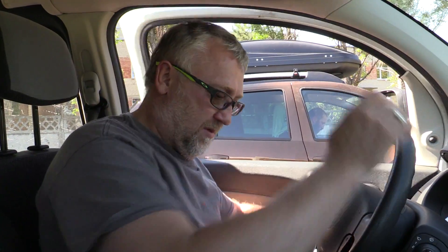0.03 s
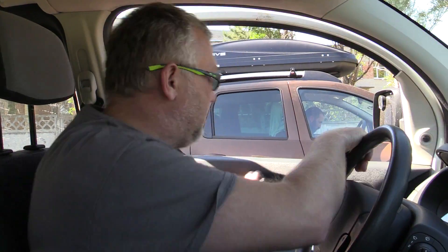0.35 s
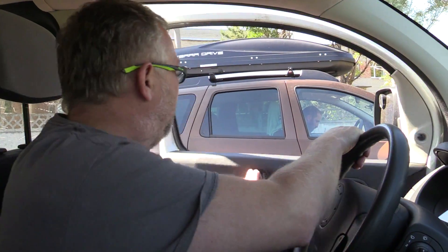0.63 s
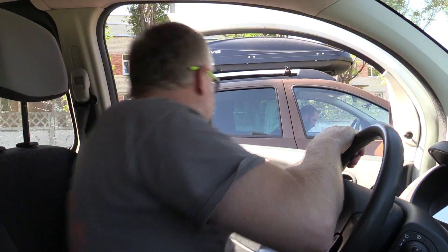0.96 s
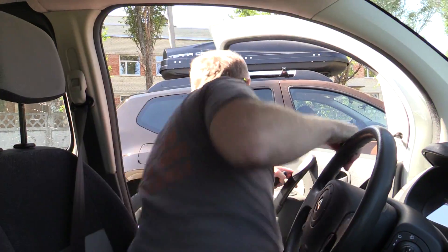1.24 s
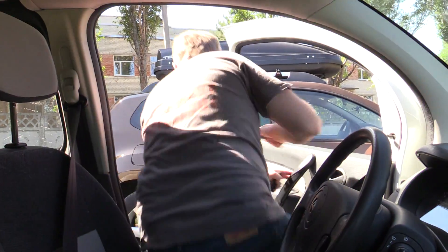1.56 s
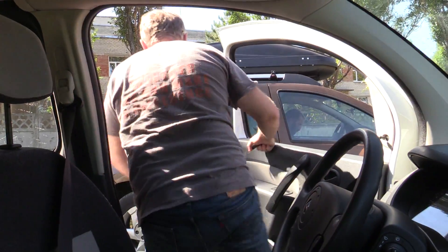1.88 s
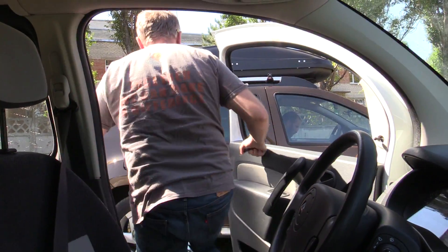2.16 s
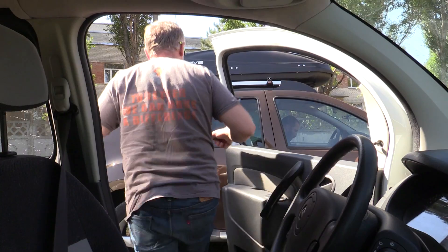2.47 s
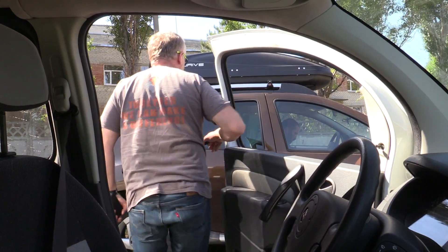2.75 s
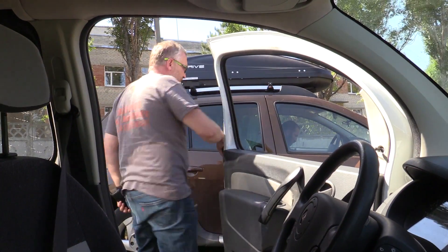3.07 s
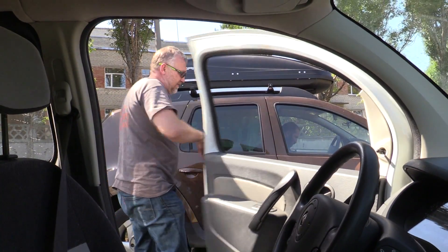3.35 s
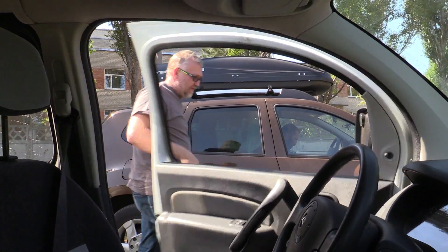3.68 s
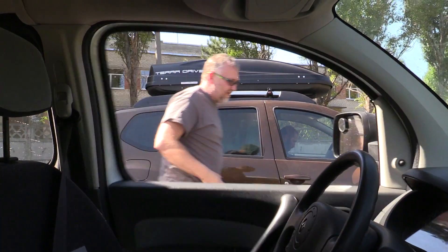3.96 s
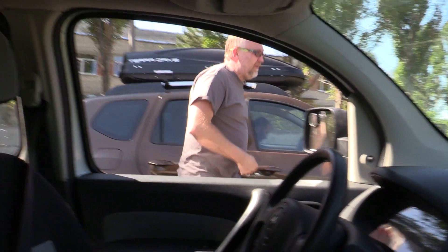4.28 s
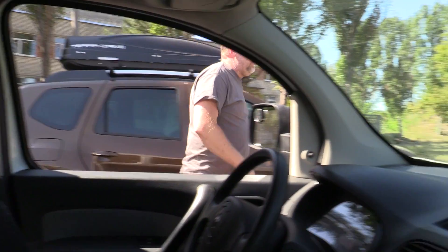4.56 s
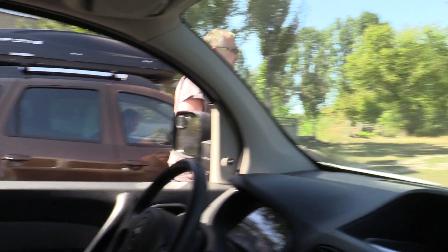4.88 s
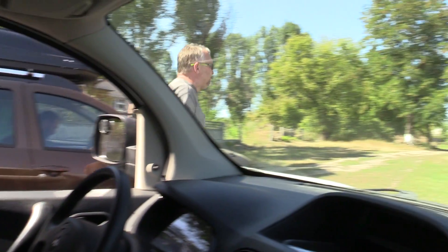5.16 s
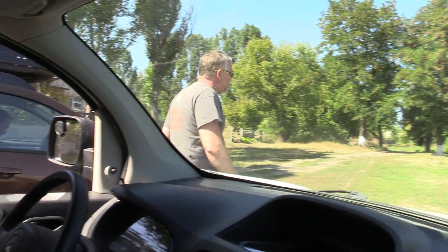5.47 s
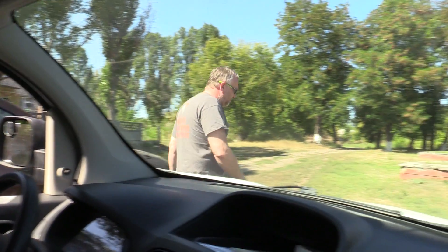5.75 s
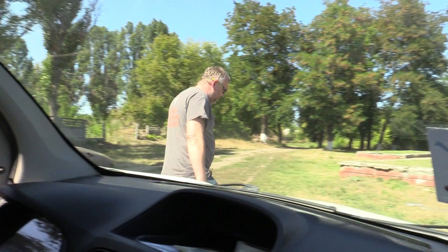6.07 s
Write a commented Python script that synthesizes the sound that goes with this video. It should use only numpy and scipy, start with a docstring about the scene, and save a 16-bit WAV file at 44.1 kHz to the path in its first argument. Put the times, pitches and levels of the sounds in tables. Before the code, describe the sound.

The sound is heard from the passenger seat of a car. Right at the start the door handle springs back with a small click and a tiny squeak. From about 0.3 to 2.7 seconds the driver slides off the seat and climbs out: cloth rustles, the cushion rumbles, limbs knock on plastic trim and weight thumps on the floor, with the sharpest knock near 1.9 seconds. A faint idling engine, distant rumble and hissing leaves run underneath, with a little more bass while the door is open. After a few soft brushes of cloth, the door's holding strap clunks quietly at 3.4 seconds. At 4 seconds the door slams, by far the loudest event: the lock snaps, the door booms and its panels rattle briefly. The cabin is then quiet apart from the faint background, until a small plastic case clicks several times in a hand around 6 seconds.

```python
"""A car door slams, heard from inside: the lock snaps, the door booms and its panels rattle.
Before that, the driver opens the door, slides off the seat and climbs out: cloth rustles, limbs knock
on the plastic trim, and the strap that holds the door open clunks. Afterwards a small plastic case
clicks in someone's hand. Behind it all are an idling engine, a far rumble and hissing leaves."""
import sys
import numpy as np
from scipy.fft import rfft, irfft, next_fast_len
from scipy.io import wavfile
from scipy.ndimage import map_coordinates

SR = 44100
rng = np.random.default_rng(int(sys.argv[2]) if len(sys.argv) > 2 else 0)


def transcribe(u):
    """Save the signal u as a 16-bit wav file named by the first command-line argument.

    u: samples, shape (n,) or (channels, n), limited to [-1, 1]; the rate is SR.
    q: integer samples, one column per channel.
    """
    v = np.clip(np.atleast_2d(u).T, -1, 1)
    q = np.round(v * 32767).astype(np.int16)
    wavfile.write(sys.argv[1], SR, q)


N = 278623

# A "tone" says how strong each frequency is: (frequency [Hz], relative level [dB])
FAR_TONE = [(15, -17), (30, -7), (45, -7.5), (70, -28.5), (170, -9), (225, -21), (330, -16), (440, -16),
            (590, -12.5), (750, -18.5), (1100, -17.5), (1700, -23.5), (2500, -40), (5000, -54.5)]
LEAF_TONE = [(800, -3), (2200, 1.5), (4000, -1), (6500, -8), (9000, -14), (12000, -22.5), (16000, -29)]
DRONE_TONE = [(30, -45), (70, -14.5), (110, 1), (165, 0), (215, -14), (400, -12.5), (800, -31.5),
              (2000, -49.5)]
CUSHION_TONE = [(20, -24), (60, -9), (110, 1.5), (165, -0.5), (195, 6), (235, -2.5), (290, -7),
                (380, -10.5), (600, -18.5), (1000, -28), (3000, -59)]
CLOTH_TONE = [(200, -14), (500, 10.5), (900, 6.5), (1800, 5.5), (3200, 1.5), (5000, -12), (7000, -49),
              (10000, -58), (16000, -42)]
BRUSH_TONE = [(500, -4), (2000, 5.5), (4000, 4.5), (6500, 3), (9000, -1.5), (12000, -7), (16000, -13)]
HISS_TONE = [(1000, 11), (2500, -2), (4200, 6), (6300, 0.5), (8000, -6.5), (11000, -17), (16000, -20)]
FLOOR_TONE = [(25, -32), (60, -12), (100, 2), (190, -2.5), (280, -6), (420, -9), (700, -21.5), (1500, -59),
              (5000, -82)]
TRIM_TONE = [(60, -17), (250, -20), (393, 7.5), (550, 3), (720, 4.5), (900, 0), (1200, 1.5), (1500, 0.5),
             (1800, -13), (2700, -5), (4500, -10), (7000, -20), (10000, -34), (16000, -48)]
LOCK_TONE = [(100, 0), (500, 6), (1250, 1), (2000, -1.5), (2900, 0.5), (4300, -9.5), (6000, -18),
             (8000, -25), (12000, -34.5), (16000, -45)]
PANEL_TONE = [(30, -30), (80, -5.5), (180, -9), (260, 1.5), (330, -3.5), (480, 3), (900, -6), (1400, -9.5),
              (2000, -19), (3200, -19.5), (5000, -32.5), (7000, -34), (10000, -46.5), (16000, -63)]
ROCKING_TONE = [(12, -46), (30, 3), (50, 5), (90, -26), (300, -93)]
BOUNCE_TONE = [(400, -18), (900, 9), (1900, 0), (3000, 0), (4200, -31), (9000, -36)]

# The notes of struck parts. A ring time is how long a sound takes to fade by 60 dB.
# (frequency [Hz], relative level [dB], ring time [s])
CASE_THUD_NOTES = [(287, -8, 0.026), (470, 10, 0.0071), (770, 1, 0.0098), (1740, 4, 0.0085)]
HANDLE_NOTES = [(830, -32, 0.05), (917, -22.5, 0.049), (1590, -27.5, 0.055), (1800, -34, 0.058),
                (2710, -30, 0.046), (3300, -40, .04)]
STRAP_NOTES = [(103.3, -29, 0.39), (169, -21.5, 0.14), (182, -30.5, 0.2), (500, -28.5, 0.085)]
CLAW_NOTES = [(5680, -3, 0.04), (6150, -1, 0.032), (6600, -3.5, 0.027), (7350, -7, 0.029),
              (7860, -10, 0.032)]  # the lock's steel claw
BOOM_NOTES = [(51.5, -27, 0.41), (67.3, -14, 0.23), (82, -9, 0.19), (100, -26, 0.53), (131, -18, 0.13),
              (146.5, -18.5, 0.4), (236, -17.5, 0.36), (260.6, -12.5, 0.32), (381.6, -14, 0.18),
              (448, -16.5, 0.22), (489, -21, 0.18), (570, -21, 0.15), (675, -22, 0.35), (700, -23, 0.2),
              (756, -23, 0.21), (857, -26.5, 0.31), (1078, -30, 0.22), (1240, -27, 0.23), (1380, -38, 0.43),
              (2135, -27, 0.18), (2620, -46, 0.2)]  # the door's shell and the air in the car
# The plastic case's tick: (multiple of its pitch, relative level [dB], ring time [s])
CASE_TICK_NOTES = [(1, 8.5, 0.0074), (1.3, -16, 0.014), (1.95, -7.5, 0.0069), (2.4, -28, 0.0051)]
# How long the door panels ring: (frequency [Hz], ring time [s])
PANEL_RING_TIMES = [(80, 0.68), (250, 0.34), (700, 0.096), (3000, 0.23), (7000, 0.076), (14000, 0.22)]

# The engine's hum: (multiple of the firing rate, level with the door shut [dB])
ENGINE_NOTES = [(1, -60.5), (2, -55), (3, -59), (4, -67), (5, -59)]
# The far rumble and the leaves rise and fall: (time [s], relative level [dB])
FAR_LEVELS = [(2.4, -57.5), (3.69, -54.5), (4.02, -51), (4.43, -54.5), (5.7, -52.5), (6.32, -55.5)]
LEAF_LEVELS = [(2.4, -62.5), (3.73, -60), (3.98, -59.5), (4.81, -64), (5.81, -64), (6.17, -69.5),
               (6.32, -73)]
# Clicks of the case: (time [s], tick gain [dB], snap level [dB])
CASE_CLICKS = [(5.954, -43, -30), (6.029, -27.5, -52), (6.0342, -28.5, -52), (6.0970, -29, -45),
               (6.1083, -42, -33), (6.1229, -22.5, -39), (6.197, -47, -29.5), (6.2008, -29.5, -36),
               (6.2072, -40, -34), (6.2733, -47, -45)]
# Thin squeaks: (time [s], length [s], start pitch [Hz], end pitch [Hz], level [dB])
SQUEAK_GLIDES = [(0, 0.021, 2440, 2440, -36), (2.487, 0.04, 2800, 2570, -55.5),
                 (2.538, 0.026, 2500, 2410, -53.5)]
# Sounds that swell and fade: (time [s], level [dB], half length [s])
CLOTH_BRUSHES = [(.02, -53, 0.018), (0.206, -57.5, 0.054), (0.281, -48, 0.019), (.41, -56, 0.009),
                 (1.168, -45.5, 0.046), (1.27, -57, 0.037), (1.334, -48, 0.022), (1.379, -50.5, 0.033),
                 (2.6, -61.5, 0.037), (3.078, -57, 0.027), (3.3, -63, 0.13), (3.81, -57, 0.012),
                 (4.633, -60.5, 0.043), (5.18, -65.5, 0.07)]
LONG_HISSES = [(.66, -49, 0.21), (1.05, -53.5, 0.14), (3.7, -67, 0.21), (5.68, -65.5, 0.38)]  # first two: cloth sliding on the seat; last two: hiss from outdoors
CAR_ROCKS = [(.36, -37, 0.061), (.65, -39.5, 0.25), (.85, -53, 0.043), (2.08, -33, 0.095)]
HAND_RUMBLES = [(5.89, -46.5, 0.015), (6.07, -46, 0.098)]
# The driver shoves across the seat: (time [s], half length [s], cushion level [dB], cloth level [dB])
SEAT_SHOVES = [(0.025, 0.025, -43.5, -42.5), (0.183, 0.063, -49, -47.5), (0.313, 0.017, -39, -38.5),
               (.372, 0.056, -31.5, -52), (0.532, 0.019, -36, -44.5), (0.583, 0.027, -37.5, -41),
               (0.658, 0.05, -30.5, -71), (0.818, 0.033, -31.5, -46.5), (1.214, 0.053, -36, -49),
               (1.612, 0.034, -45, -55.5), (1.935, 0.029, -30.5, -48.5), (2.002, 0.017, -28, -42),
               (2.16, 0.023, -30.5, -53.5), (2.256, 0.031, -30.5, -71), (2.305, 0.012, -37, -52.5)]
# Knocks on the trim: (time [s], level [dB], brightness [dB/octave], note pitch [Hz], note level [dB])
TRIM_KNOCKS = [(0.32, -29.5, -4, 715, -28), (0.381, -25, -6, 873, -23), (.396, -32.5, -2, 520, -35),
               (0.511, -31.5, -6, 696, -52), (.742, -34, -2, 993, -27), (0.837, -33.5, -5.5, 810, -32),
               (1.224, -34.5, 1, 800, -36), (1.297, -39, 2, 915, -52), (1.352, -45, -1, 870, -30),
               (1.41, -37, -0.5, 1080, -36), (1.8726, -22, 1, 393, -21), (1.921, -43, 1.5, 540, -40),
               (1.990, -35, 0, 390, -44), (2.232, -32, -6, 394, -28), (2.243, -37, -7, 563, -32),
               (2.614, -30.5, -6.5, 328, -36), (2.672, -37.5, -7, 317, -40)]
# Weight shifts on the seat and door sill: (time [s], level [dB])
FLOOR_THUMPS = [(.335, -28.5), (0.405, -34), (0.788, -34.5), (1.196, -39.5), (1.919, -26), (1.986, -28),
                (2.030, -32.5), (2.66, -40.5), (3.835, -43.5)]
# The lock snaps shut; the door hits its seals and shakes: (time [s], level [dB], brightness [dB/octave])
LOCK_SNAPS = [(3.9863, -10.5, 0), (3.9988, -25, 8), (4.0038, -26.5, 6.5)]
DOOR_HITS = [(3.9991, -18, -4), (4.0060, -14, -6), (4.0216, -20.5, 3), (4.0366, -15.5, 1), (4.0454, -14, 1),
             (4.0690, -20, -7), (4.0839, -26, 3.5), (4.0950, -27.5, 0.5), (4.1212, -30.5, 1),
             (4.142, -36, 1.5), (4.2085, -49.5, 3.5)]
# The claw drops into its last notch: (time [s], gain [dB])
CLAW_DROPS = [(3.9975, -19), (4.0036, -27)]

DOOR_OPENS_S, DOOR_WIDE_S, DOOR_SHUT_S, SEAL_S = 0.3, 1, 3.98, 0.04
HIT_SAMPLES = 24000
TIME = np.arange(N) / SR


def amp(db):
    """Turn decibels into a gain."""
    return 10 ** (np.asarray(db) / 20)


def along(points, hz):
    """Look up a value between the rows of a frequency table, on a log scale."""
    freqs, values = np.transpose(points)
    return np.interp(np.log(hz + 1), np.log(freqs), values)


def curve(rows):
    """Join (time, value) points with straight lines."""
    return np.interp(TIME, *np.transpose(rows))


def wobble(rate):
    """A smooth random curve through `rate` points a second."""
    return map_coordinates(rng.standard_normal(N // 40), [TIME * rate], mode="wrap")


def swells(rows):
    """A gain made of bell-shaped bumps."""
    return sum(amp(db) * np.exp(-((TIME - s) / width) ** 2) for s, db, width in rows)


def gate(on, attack, off, release):
    """A gain that rises from 0 to 1, holds and falls back (times in seconds)."""
    return np.clip((TIME - on) / attack, 0, 1) * np.clip(1 - (TIME - off) / release, 0, 1)


def filtered(x, gain):
    """Turn each frequency of x up or down by gain(hz)."""
    size = next_fast_len(len(x) + 8192)
    return irfft(rfft(x, size) * gain(np.fft.rfftfreq(size, 1 / SR)), size)[:len(x)]


def noise(tone, grain_db=0):
    """Noise of strength 1 with the given tone; grain_db makes it crackle."""
    grains = rng.standard_normal(N) * amp(grain_db * rng.standard_normal(N))
    shaped = filtered(grains, lambda hz: amp(along(tone, hz)))
    return shaped / np.sqrt(np.mean(shaped ** 2) + 1e-20)


def add(track, s, sound):
    """Mix a sound in, starting at s seconds."""
    start = round(s * SR)
    track[start:start + len(sound)] += sound[:N - start]


def ring(notes, attack):
    """A struck object rings with a few fading notes that build up over `attack` seconds."""
    t = TIME[:HIT_SAMPLES]
    ringing = sum(amp(db - 60 * t / ring_s) * np.sin(2 * np.pi * hz * t) for hz, db, ring_s in notes)
    return ringing * (1 - np.exp(-t / attack))


def burst(tone, ring_times, bright_db=0, rise=1):
    """A noisy hit: each octave builds over `rise` cycles, then fades by the (Hz, s) ring_times."""
    t, hz = TIME[:HIT_SAMPLES], np.fft.rfftfreq(HIT_SAMPLES, 1 / SR)
    octave = np.log2(hz + 1)
    spectrum = amp(along(tone, hz) + bright_db * octave) * np.exp(2j * np.pi * rng.random(len(hz)))
    centres = np.arange(5, 15)[:, None]  # octaves from 32 Hz up
    bands = irfft(spectrum * np.maximum(1 - abs(octave - centres), 0)) / np.std(irfft(spectrum))
    build = 1 - np.exp(-t * 2 ** centres / rise)
    fade = amp(-60 * t / along(ring_times, 2 ** centres))
    return np.sum(bands * build * fade, axis=0)


def outdoors():
    """An engine idles under a far rumble and hissing leaves; the open door lets more bass in."""
    firing_hz, engine_rise_db = 26.7, 5.5
    drone_db, drone_rise_db = -63.5, 13
    door_open = gate(DOOR_OPENS_S, DOOR_WIDE_S - DOOR_OPENS_S, DOOR_SHUT_S, SEAL_S)
    phase = 2 * np.pi * firing_hz * TIME + 0.26 * wobble(4.1)
    hum = sum(amp(db + 2 * wobble(5)) * np.sin(k * phase + 2 * np.pi * rng.random())
              for k, db in ENGINE_NOTES)
    engine = amp(engine_rise_db * door_open) * hum
    far = amp(curve(FAR_LEVELS) + 2.5 + 0.35 * wobble(6)) * noise(FAR_TONE)
    drone = amp(drone_db + drone_rise_db * door_open) * noise(DRONE_TONE)
    leaves = amp(curve(LEAF_LEVELS) + 3 + 0.68 * wobble(8.9)) * noise(LEAF_TONE, grain_db=5)
    return engine + far + drone + leaves


def long_hisses():
    """Long swells of hiss: cloth sliding on the seat early on, then hiss from outdoors."""
    return swells(LONG_HISSES) * noise(HISS_TONE, grain_db=7)


def car_rocking():
    """The car rocks on its springs with a deep rumble."""
    return swells(CAR_ROCKS) * noise(ROCKING_TONE)


def plastic_case():
    """A plastic case ticks over the soft rumble of the hand that grips it; hard clicks also thud."""
    case_hz, hard_tick_db = 954, -23
    out = swells(HAND_RUMBLES) * noise(FLOOR_TONE)
    for s, tick_db, snap_db in CASE_CLICKS:
        pitch_hz = case_hz * (1 + 0.04 * rng.standard_normal())
        notes = [(k * pitch_hz, db, ring_s) for k, db, ring_s in CASE_TICK_NOTES]
        thud_db = -23.5 + 3.5 * (tick_db - hard_tick_db)  # grows faster than the tick
        add(out, s, amp(tick_db) * ring(notes, attack=0.00055))
        add(out, s, amp(thud_db) * ring(CASE_THUD_NOTES, attack=0.00073))
        add(out, s, amp(snap_db) * burst(LOCK_TONE, [(1000, 0.014), (8000, 0.0034)], bright_db=-2.5))
    return out


def squeaks():
    """Faint, thin squeaks waver around a steady or falling pitch."""
    out = np.zeros(N)
    for s, length, start_hz, end_hz, db in SQUEAK_GLIDES:
        progress = np.linspace(0, 1, round(length * SR))
        waver = 1 + 0.022 * wobble(480)[:len(progress)]
        pitch_hz = (start_hz + (end_hz - start_hz) * progress) * waver
        add(out, s, amp(db) * np.sin(np.pi * progress) * np.sin(2 * np.pi * np.cumsum(pitch_hz) / SR))
    return out


def cushion_and_cloth():
    """The cushion rumbles and cloth snags as the driver slides; quick brushes of cloth come and go."""
    cushion_db = -38.5
    cloth_db = -52 - 4 * TIME  # less cloth touches the seat as he leaves it
    drag = gate(on=0.267, attack=0.04, off=2.05, release=0.45)
    cushion_shoves = swells([(s, db, width) for s, width, db, _ in SEAT_SHOVES])
    cloth_shoves = swells([(s, db, width) for s, width, _, db in SEAT_SHOVES])
    press = np.hypot(amp(cushion_db) * drag, cushion_shoves)
    rub = np.hypot(amp(cloth_db) * drag, cloth_shoves)
    cushion = press * amp(0.99 * wobble(14.4)) * noise(CUSHION_TONE)
    cloth = rub * amp(2.3 * wobble(110)) * noise(CLOTH_TONE, grain_db=7)
    brushes = swells(CLOTH_BRUSHES) * amp(2.2 * wobble(150)) * noise(BRUSH_TONE, grain_db=4)
    return cushion + cloth + brushes


def knocks():
    """Limbs clack against the plastic trim and the driver's weight thumps the floor."""
    out = np.zeros(N)
    for s, db, bright_db, note_hz, note_db in TRIM_KNOCKS:
        ring_s = 0.044 * 2 ** (-bright_db / 9)  # a duller knock is softer and lasts longer
        ring_times = [(300, 2.9 * ring_s), (1200, ring_s), (6000, 1.14 * ring_s)]
        add(out, s, amp(db) * burst(TRIM_TONE, ring_times, bright_db, rise=0.18))
        add(out, s, ring([(note_hz, note_db, 28 / note_hz)], attack=0.00057))  # rings for 28 cycles
    for s, db in FLOOR_THUMPS:
        add(out, s, amp(db) * burst(FLOOR_TONE, [(70, 0.97), (200, 0.4), (800, 0.089)], rise=0.098))
    return out


def handle_and_strap():
    """The handle springs back and bounces; later the door's strap drops off its notch with a clunk."""
    handle_s, bounce_s, strap_s = 0.0652, 0.0885, 3.3845
    out = np.zeros(N)
    add(out, handle_s, ring(HANDLE_NOTES, attack=0.00062))
    add(out, handle_s, amp(-34.5) * burst(TRIM_TONE, [(500, 0.14), (7000, 0.032)]))
    add(out, bounce_s, amp(-36) * burst(BOUNCE_TONE, [(900, 0.086), (3000, 0.065)]))
    add(out, strap_s, ring(STRAP_NOTES, attack=0.0065))
    add(out, strap_s, amp(-36.5) * burst(FLOOR_TONE, [(300, 0.1), (4000, 0.037)], bright_db=6.5))
    return out


def door_swing():
    """A low rumble grows as the door speeds up and ends as it lands."""
    peak_db, rise_db_per_s = -42.5, 19
    to_go = DOOR_SHUT_S - TIME
    cutoff = np.clip(1 + to_go / SEAL_S, 0, 1)
    return amp(peak_db - rise_db_per_s * abs(to_go)) * cutoff * noise(DRONE_TONE)


def door_rattle(s, gain_db, ring_s, count):
    """Loose parts inside the door chatter in random ticks that die away."""
    ticks = np.zeros(N)
    for when, weakness in rng.random((count, 2)):
        delay = 0.2 * when
        tick = rng.standard_normal(200) * np.exp(-np.arange(200) / 45)
        add(ticks, s + delay, amp(gain_db - 60 * delay / ring_s - 9.8 * weakness) * tick)
    return filtered(ticks, lambda hz: amp(along(LOCK_TONE, hz)))


def door_slam():
    """The lock snaps first; then the door lands, booms and shudders against its seals."""
    out = door_rattle(4.0, gain_db=-5, ring_s=0.42, count=34)
    for s, db, bright_db in LOCK_SNAPS:
        snap = burst(LOCK_TONE, [(500, 0.15), (3000, 0.1), (7000, 0.14), (14000, 0.13)], bright_db)
        add(out, s, amp(db) * snap)
    for s, db in CLAW_DROPS:
        add(out, s, amp(db) * ring(CLAW_NOTES, attack=0.0007))
    for s, db, bright_db in DOOR_HITS:
        add(out, s, amp(db) * burst(PANEL_TONE, PANEL_RING_TIMES, bright_db, rise=0.15))
    add(out, 3.9975, amp(2.5) * ring(BOOM_NOTES, attack=0.011))
    return out


def scene():
    """Everything as heard from the passenger seat, in one channel."""
    return (handle_and_strap() + cushion_and_cloth() + long_hisses() + car_rocking() + knocks()
            + squeaks() + door_swing() + door_slam() + plastic_case() + outdoors())[None]


def record(dry):
    """Round off the loudest peaks and cut the very highest treble."""
    ceiling, top_hz = 0.8, 15800
    rounded = dry[0] / (1 + (dry[0] / ceiling) ** 6) ** (1 / 6)
    return filtered(rounded, lambda hz: hz < top_hz)[None]


dry = scene()
out = record(dry)
transcribe(out)
```